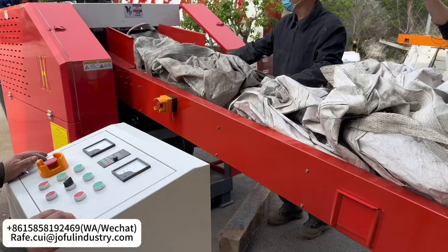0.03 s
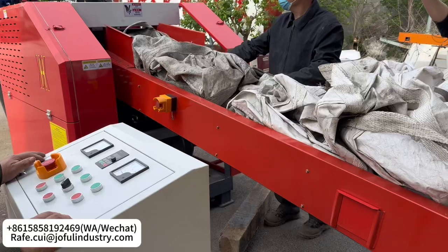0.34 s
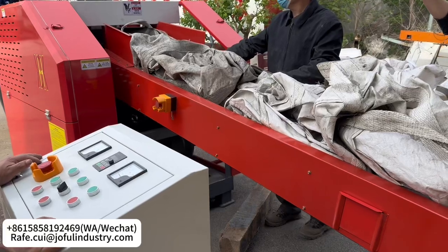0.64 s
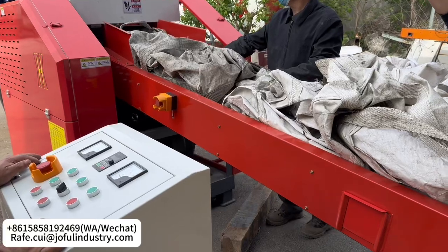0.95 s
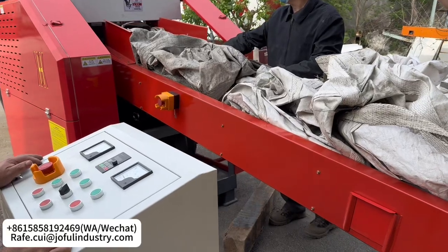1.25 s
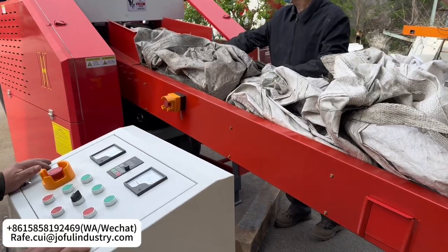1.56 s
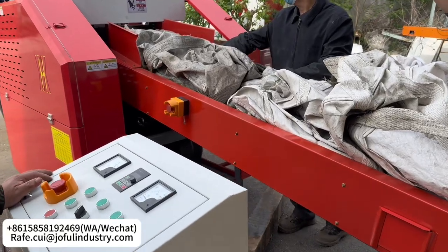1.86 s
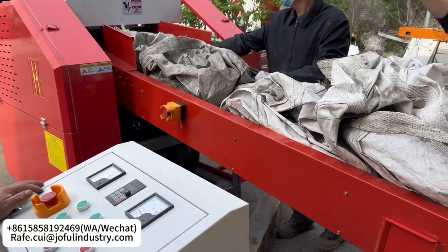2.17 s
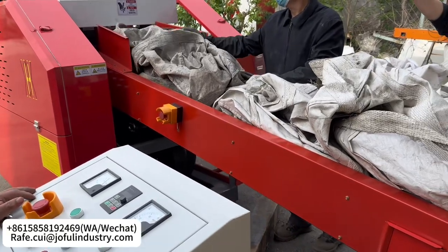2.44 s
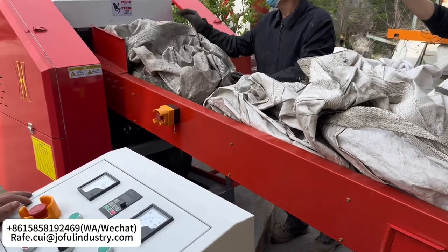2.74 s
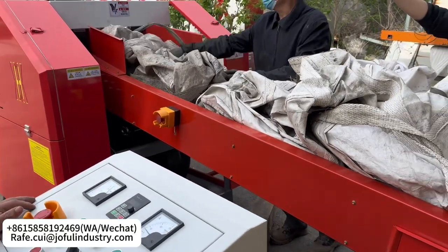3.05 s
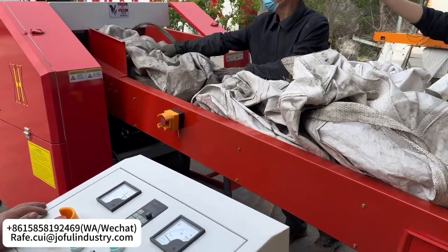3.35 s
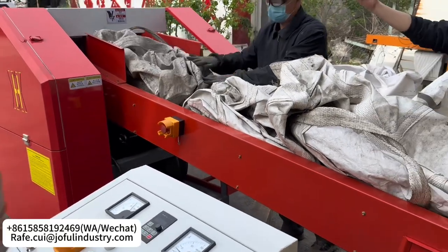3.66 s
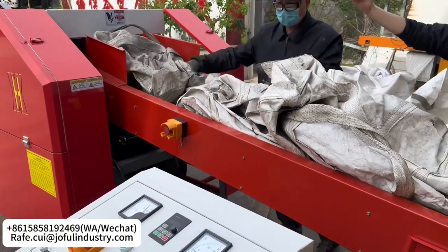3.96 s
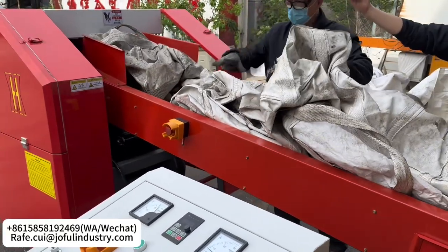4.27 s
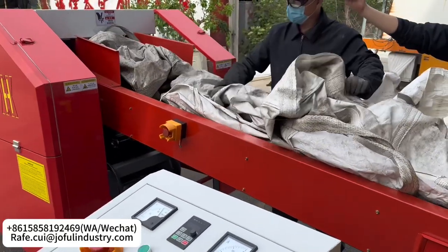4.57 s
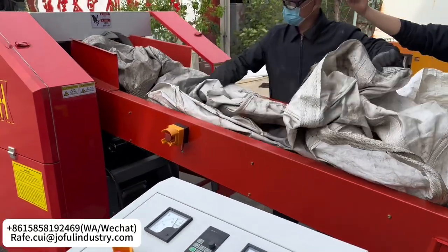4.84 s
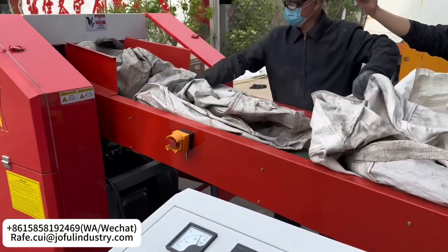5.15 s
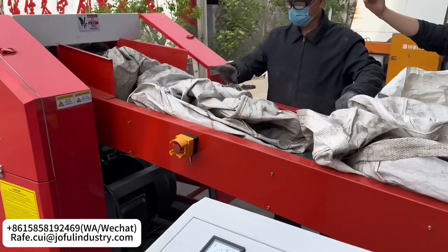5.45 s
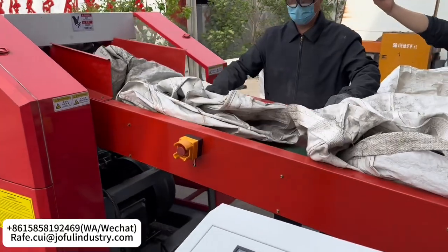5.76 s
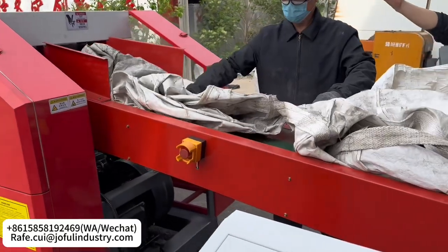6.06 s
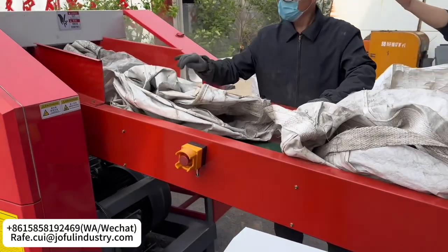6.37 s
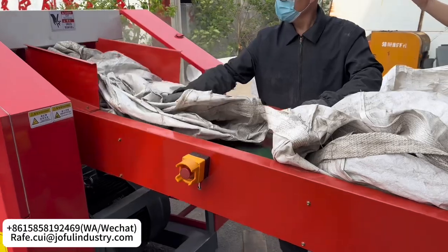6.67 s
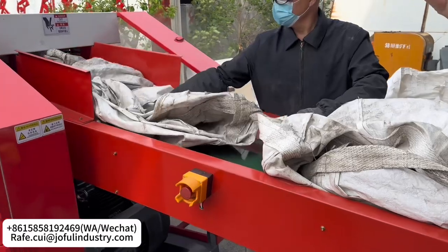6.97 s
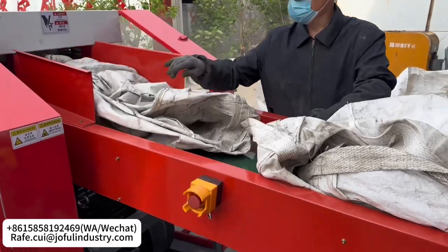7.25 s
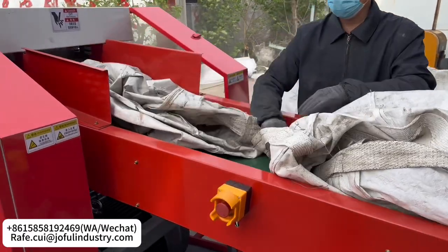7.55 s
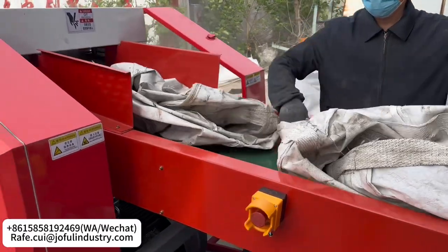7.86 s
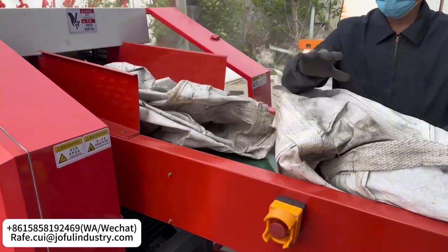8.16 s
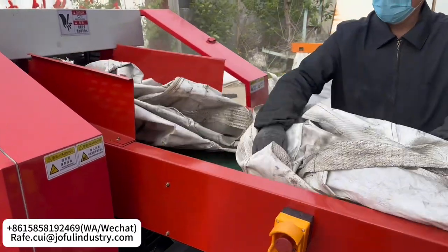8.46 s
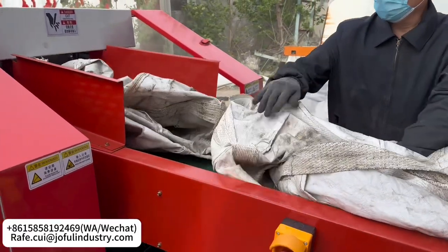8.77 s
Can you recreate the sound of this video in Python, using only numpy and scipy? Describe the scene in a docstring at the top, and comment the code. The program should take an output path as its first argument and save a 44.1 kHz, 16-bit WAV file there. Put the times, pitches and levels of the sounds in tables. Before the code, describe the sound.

Close to an outdoor shredding machine, a loud, fast-repeating mechanical drone carries the rasp and crackle of woven plastic sacks being torn. At first the steel rings brightly over it. Then the load builds: the sound grows lower and lumpier, fabric groans and squeals against metal, and the knives clink and knock. Thick wads thump through near the end, and the machine keeps grinding without a pause.

```python
"""Shredder chewing woven plastic bulk bags.

A single-shaft machine outdoors, heard beside its feed conveyor. Six knife rows pass in each turn, at
about 4.4 turns/s, so the housing drones in a repeating pattern. As more bag is drawn in, the drone
deepens and irregular churning grows; the knives rasp, the steel rings, the fabric crackles."""
import sys
import numpy as np
from scipy import signal
from scipy.fft import rfft, irfft, next_fast_len
from scipy.io import wavfile
from scipy.ndimage import uniform_filter1d, map_coordinates

SR = 44100
rng = np.random.default_rng(int(sys.argv[2]) if len(sys.argv) > 2 else 0)


def dump_mix(stems):
    """Bounce the given channels to the path in sys.argv[1] as a 16-bit WAV at rate SR."""
    frames = np.atleast_2d(stems).T  # one column per channel
    limited = np.clip(frames, -1, 1)  # hard clip at full scale
    pcm = np.round(limited * 32767).astype(np.int16)
    wavfile.write(sys.argv[1], SR, pcm)


N = 388521
TIME_S = np.arange(N) / SR
FFT_SIZE = next_fast_len(N, True)
BIN_HZ = np.maximum(np.arange(FFT_SIZE // 2 + 1) * SR / FFT_SIZE, 1)
TURN_SAMPLES = 10080

# Rotor speed, sagging under load: time_s, turns_per_s
ROTOR_SPEED = [(0, 4.373), (3.3, 4.373), (5.0, 4.365), (6.5, 4.351), (7.3, 4.339), (8.0, 4.34),
               (8.8, 4.348)]
# Knife rows, relative levels at light and heavy load: start_turns, length_turns, light_db, heavy_db
KNIFE_ROWS = [(0.051, 0.18, -1.5, -1.5), (0.222, 0.19, -1, -1.5), (0.387, 0.064, -14, -2.5),
              (0.558, 0.12, -7, -1.5), (0.725, 0.15, -1, -4.5), (0.892, .13, -5, -3.5)]


def from_db(db):
    """Decibels to gain."""
    return np.exp(np.asarray(db) * np.log(10) / 20)


def unit_rms(x):
    """Scale to rms 1."""
    return x / np.sqrt(np.mean(x ** 2) + 1e-20)


def in_time(rows):
    """Curve at every sample."""
    return np.interp(TIME_S, *np.transpose(rows))


def at_hz(rows, hz):
    """Each column of a spectrum at the given frequencies."""
    points_hz, *columns = np.transpose(rows)
    return [np.interp(np.log(hz), np.log(points_hz), column) for column in columns]


def colour(x, gain):
    """Filter by a gain per FFT bin."""
    return irfft(rfft(x, FFT_SIZE) * gain, FFT_SIZE)[..., :N]


def drift(cutoff_hz):
    """Smooth random curve, rms 1."""
    return unit_rms(colour(rng.standard_normal(N), 1 / (1 + (BIN_HZ / cutoff_hz) ** 4)))


def swell(start_s, length_s, edge_s):
    """Trapezoid window, 0 to 1."""
    return np.clip(.5 + np.minimum(TIME_S - start_s, start_s + length_s - TIME_S) / edge_s, 0, 1)


def resonate(x, hz, width_hz):
    """One resonance, peak gain 1."""
    radius = np.exp(-np.pi * width_hz / SR)
    feedback = [1, -2 * radius * np.cos(2 * np.pi * hz / SR), radius ** 2]
    return signal.lfilter(np.array([1, 0, -1]) * (1 - radius ** 2) / 2, feedback, x + 1e-18)


def ring_mode(x, load, hz, width_hz, light_db, heavy_db):
    """Resonance whose level follows the load."""
    return unit_rms(resonate(x, hz, width_hz)) * from_db(light_db + load * (heavy_db - light_db))


def each_turn(patterns, turns):
    """Loop a pair of one-turn patterns at the rotor's angle."""
    index = turns % 1 * TURN_SAMPLES
    return np.array([map_coordinates(p, [index], order=3, mode="grid-wrap") for p in patterns])


def once_a_turn(turns, peak_turns, swing_db):
    """Gain that peaks at one rotor angle."""
    return from_db(swing_db * np.cos(2 * np.pi * (turns - peak_turns)))


def cutting_force(turns, load, hold, rise_turns, light_gap_db, heavy_gap_db):
    """Each knife row bites quickly and lets go; a full gap rubs between the rows too."""
    grid_turns = np.arange(TURN_SAMPLES) / TURN_SAMPLES
    power = from_db([[light_gap_db], [heavy_gap_db]]) ** 2
    for start_turns, length_turns, *db in KNIFE_ROWS:
        age_turns = (grid_turns - start_turns) % 1
        attack = 1 - np.exp(-(age_turns / rise_turns) ** 2)
        release = np.exp(-(age_turns / (length_turns * hold)) ** 4)
        power = power + np.outer(from_db(db) ** 2, attack * release)
    light, heavy = [np.interp(turns % 1, grid_turns, p) for p in power]
    return unit_rms(np.sqrt((1 - load) * light + load * heavy))


def housing_drone(turns, load, scatter=.25, waver_db=.5):
    """The same blows recur every turn, so the housing sounds a dense comb of rotor orders."""
    # Blows swelling a housing mode: mode_order, place_turns, length_turns, light_db, heavy_db
    blows = [(24, .43, .19, 3, 3), (48, .7, .15, 6, 8), (62, .14, .07, 13, 4), (62, .34, .08, 15, 13),
             (62, .48, .07, 7, 13), (62, .95, .06, 5, 6), (84, .15, .12, 15, 6), (84, .31, .06, 2, 11),
             (84, .68, .06, 7, 11), (84, .92, .06, 11, 0)]
    # Strong multiples of the turn rate, relative levels: order, light_db, heavy_db
    strong_orders = [(12, -44.9, -45.2), (18, -33.3, -34.3), (22, -50.8, -38.7), (24, -35, -33.5),
                     (25, -41.2, -36.6), (26, -47.5, -38.2), (30, -38.5, -40.5), (36, -43.4, -34.5),
                     (42, -44.0, -31.5), (46, -37.5, -35.0), (48, -39.5, -29.5), (49, -39.3, -35.6),
                     (50, -46.2, -38.3), (54, -37.7, -46.0), (56, -41, -44), (60, -38.5, -38.9),
                     (61, -34.3, -39), (62, -27, -32.5), (63, -37.5, -40.5), (64, -40, -35),
                     (66, -35.9, -45.7), (67, -41, -45), (69, -43.5, -45), (73, -40.1, -41.1),
                     (74, -37.9, -40.9), (77, -42, -44), (84, -29.3, -47), (85, -39, -44), (86, -36, -36),
                     (88, -42, -45), (90, -43.5, -45), (92, -43.5, -45), (102, -37.5, -43.9),
                     (108, -39, -46), (114, -38.6, -41.3), (120, -41.3, -44.7)]
    # Orders between them: pitch_hz, light_db, heavy_db
    weak_orders = [(44, -66, -75), (63, -58, -60), (85, -65, -53), (118, -51, -43.5), (164, -48.5, -39.5),
                   (229, -41, -74), (273, -65, -49), (370, -49.5, -46.5), (470, -47.5, -55),
                   (646, -49, -44), (835, -50.5, -53), (1130, -58.5, -58)]
    orders = np.arange(1, 321)
    chance = rng.standard_normal((2, len(orders))) + 1j * rng.standard_normal((2, len(orders)))
    spectra = scatter * chance
    for mode_order, place_turns, length_turns, *db in blows:
        offset = orders - mode_order
        push = np.exp(-(np.pi * length_turns * offset) ** 2 - 2j * np.pi * offset * place_turns)
        mode_phasor = np.exp(1j * np.angle(chance[:, [mode_order - 1]]))
        spectra = spectra + from_db(db)[:, None, None] * push * mode_phasor
    # The blows set each order's phase, the housing its strength.
    levels_db = np.array(at_hz(weak_orders, orders * ROTOR_SPEED[0][1]))
    for order, *db in strong_orders:
        levels_db[:, round(order) - 1] = db
    combs = from_db(levels_db)[:, None] * spectra / abs(spectra)
    patterns = irfft(np.pad(combs, ((0, 0), (0, 0), (1, 0))), TURN_SAMPLES)
    light, heavy = [each_turn(pair, turns) for pair in patterns]
    drone = (1 - load ** 2) * light + load ** 2 * heavy
    return TURN_SAMPLES / np.sqrt(2) * drone * from_db(waver_db * drift(1.7))


def bag_churn(load, force, lumpy_db=1):
    """Bags are dragged and crushed differently each turn: a lumpy rumble growing with load."""
    # Rumble, relative noise density: freq_hz, light_db, heavy_db
    spectrum = [(20, -80, -78), (32, -71, -83), (49.4, -73, -74), (75, -43, -66.5), (112, -62, -48.5),
                (184, -54, -49.5), (261, -53, -46.5), (370, -52.5, -46.5), (600, -55.5, -53),
                (805, -63, -55), (1083, -58.5, -53.5), (1600, -66, -75), (2160, -95, -98)]
    lumps = force ** .78 * from_db(lumpy_db * drift(29))
    push = unit_rms(lumps * rng.standard_normal((2, N))) * np.sqrt(SR / 2)
    light, heavy = [colour(push, from_db(db)) for db in at_hz(spectrum, BIN_HZ)]
    return (1 - load) * light + load * heavy


def friction(turns, force, repeat_share, rough_db, clatter_db):
    """Rough rubbing under the knives; a share of it is clatter that repeats every turn."""
    clatter = rng.standard_normal((2, TURN_SAMPLES)) * from_db(clatter_db * drift(230)[:TURN_SAMPLES])
    repeating = np.sqrt(repeat_share) * each_turn(unit_rms(clatter), turns)
    fresh = np.sqrt(1 - repeat_share) * rng.standard_normal((2, N))
    return unit_rms((repeating + fresh) * force * from_db(rough_db * drift(155)))


def crackle(force, base_per_s, spread_db, decay_s):
    """Plastic tapes break in tiny bursts, more often while a knife cuts."""
    breaks = rng.random(N) < base_per_s * force / SR
    sizes = from_db(spread_db * np.minimum(rng.exponential(1, N), 4))
    power = signal.lfilter([1], [1, -np.exp(-1 / (decay_s * SR))], (breaks * sizes) ** 2 + 1e-18)
    return unit_rms(np.sqrt(power) * rng.standard_normal((2, N)))


def knife_rasp(turns, load, force):
    """Knives rasp through fabric, slightly softer in a full gap."""
    # Rasp colour: freq_hz, gain_db
    spectrum = [(700, -19), (1250, 3.5), (1600, 6.5), (1950, 2.5), (2400, 2), (3000, 1), (4200, -4),
                (5500, -5.5), (7000, -13), (9000, -22), (12000, -63), (16000, -32)]
    rasp = friction(turns, force, repeat_share=.3, rough_db=1, clatter_db=1.5)
    rasp += from_db(-6) * crackle(force, base_per_s=190, spread_db=4, decay_s=.024)
    return from_db(-31.5 - .9 * load) * unit_rms(colour(rasp, from_db(at_hz(spectrum, BIN_HZ)[0])))


def fibre_hiss(turns, force):
    """Tearing fibres give a fine, crackling hiss."""
    # Hiss colour: freq_hz, gain_db
    spectrum = [(4000, -17), (6500, 2), (8600, 5), (10500, -2), (12000, 1), (14000, -1.5), (16000, -3.5)]
    # Hiss envelope: time_s, level_db
    envelope = [(0, -44.5), (1.95, -43), (2.1, -39), (3.3, -39), (5.8, -39.5), (6.5, -39), (6.95, -34.5),
                (7.4, -38.5), (8, -37.5), (8.8, -40.5)]
    hiss = friction(turns, force ** .7, repeat_share=.15, rough_db=1.3, clatter_db=2.5)
    hiss += from_db(-2) * crackle(force, base_per_s=110, spread_db=3.3, decay_s=.004)
    return from_db(in_time(envelope)) * unit_rms(colour(hiss, from_db(at_hz(spectrum, BIN_HZ)[0])))


def steel_ring(rub, load, force):
    """Rubbing keeps the steel ringing, pulsed by the cutting force."""
    # Steel resonances: pitch_hz, width_hz, light_db, heavy_db
    modes = [(1203, 19, -31, -61), (2136, 11, -50, -58), (2628, 24, -49, -64), (3677, 13, -54, -56),
             (4030, 100, -49, -54), (642, 31, -45, -35), (854, 9, -48, -43), (1346, 17, -48, -59),
             (2360, 40, -46, -56.5)]
    return force * sum(ring_mode(rub, load, *mode) for mode in modes)


def stick_slip(rub, turns, bite):
    """Fabric sticks and slips on the steel; single resonances sing, pulsing with the knives."""
    # Tone kinds: kind, width_hz, steadiness, bite_exponent, peak_turns, swing_db, edge_s
    voices = [("groan", 11, .75, .6, .65, .5, .08), ("howl", 7, .9, .3, .25, 2.8, .12),
              ("chatter", 7, 1, 1, .75, 1, .12), ("ring", 14, .35, .6, .98, 2, .25)]
    # Fabric drags: kind, start_s, length_s, pitch_hz, level_db
    drags = [("groan", 3.87, .19, 642, -31), ("groan", 4.18, .1, 660, -30), ("groan", 4.41, .1, 640, -31),
             ("groan", 4.57, .36, 637, -31), ("groan", 5.4, .75, 630, -34.5), ("groan", 7.55, .3, 710, -33),
             ("groan", 8.15, .6, 578, -31), ("groan", 7.45, 1.3, 209, -28.5), ("howl", 0, 1.5, 847, -31),
             ("howl", 3.88, .12, 1085, -34), ("howl", 4.33, .42, 1085, -38),
             ("howl", 4.77, .17, 846, -28.5), ("howl", 5.15, 1.1, 1113, -36),
             ("howl", 5.43, .45, 845, -29.5), ("howl", 5.5, 1.95, 935, -37), ("howl", 6.45, .35, 843, -35),
             ("howl", 7.9, .95, 857, -33), ("chatter", 0, 1.4, 1686, -38.5),
             ("chatter", 3.3, .7, 1684, -36.5), ("chatter", 4.03, .37, 1575, -38.5),
             ("chatter", 5.25, 1.4, 1660, -40.5), ("chatter", 7.05, 1.15, 1665, -38),
             ("ring", 0, 1.1, 1684, -40), ("ring", 0, 2.2, 2137, -45.5), ("ring", 0, 3.4, 2632, -49),
             ("ring", 0, 2.2, 2929, -51.5), ("ring", 0, 1.3, 3505, -51), ("ring", 0, 1.9, 3677, -48),
             ("ring", 1.9, 2.4, 3677, -51), ("ring", 0, 2.3, 3978, -52.5), ("ring", 0, 4.2, 5700, -59),
             ("ring", .33, .14, 3690, -45), ("ring", 2.2, 1.2, 1190, -41), ("ring", 2.2, 4, 2155, -46.5),
             ("ring", 2.3, 1.7, 2980, -48), ("ring", 2.3, 1.8, 3451, -53)]
    out = np.zeros((2, N))
    for voice, width_hz, steadiness, bite_exponent, peak_turns, swing_db, edge_s in voices:
        pulse = unit_rms(bite ** bite_exponent * once_a_turn(turns, peak_turns, swing_db))
        for kind, start_s, length_s, pitch_hz, level_db in drags:
            if kind == voice:
                contact = swell(start_s, length_s, edge_s)
                touching = contact > 0
                tone = resonate(rub[:, touching], pitch_hz, width_hz)
                power = abs(uniform_filter1d(tone ** 2, size=256)) + 1e-12
                tone = unit_rms(tone / power ** (steadiness / 2))
                out[:, touching] += from_db(level_db) * tone * (contact * pulse)[touching]
    return out


def knife_chatter(turns, load, lag_turns=.028, spread_db=2):
    """Each row clips the counter-knife just after biting: one strike, varied per mode."""
    # Knife resonances: pitch_hz, width_hz, light_db, heavy_db
    modes = [(1603, 34, -50, -48), (1685, 18, -43, -46), (1773, 24, -49, -63), (2262, 44, -53, -51),
             (2990, 17, -57, -56)]
    hits = np.zeros(N)
    for start_turns, _, light_db, heavy_db in KNIFE_ROWS:
        at = np.flatnonzero(np.diff(np.floor(turns - start_turns - lag_turns)))
        hits[at] = from_db(light_db + load[at] * (heavy_db - light_db))
    at = np.flatnonzero(hits)
    out = np.zeros((2, N))
    for mode in modes:
        strengths = hits[at] * from_db(rng.normal(0, spread_db, len(at)))
        strikes = np.zeros((2, N))
        strikes[:, at] = strengths * rng.choice([-1, 1], (2, len(at)))
        out += ring_mode(strikes, load, *mode)
    return out


def frame_rumble(level_db, centre_hz=62, width_hz=91, rise_s=.026):
    """A low frame rumble swells as bunches of fabric pass; a sheared wad adds a boom."""
    # Thick wads jolting the rotor: start_s, pitch_hz, peak_db
    jolts = [(.575, 62, -27), (5.274, 107, -19), (6.284, 114, -27), (6.495, 108, -22),
             (6.728, 109.3, -15.5), (6.919, 188, -23), (7.186, 102, -14)]
    rumble = resonate(rng.standard_normal((2, N)), centre_hz, width_hz)
    out = unit_rms(resonate(rumble, centre_hz, width_hz)) * from_db(level_db)
    for start_s, pitch_hz, peak_db in jolts:
        age_s = np.maximum(TIME_S - start_s, 0)
        envelope = (age_s / rise_s * np.exp(1 - age_s / rise_s)) ** 2
        out[0] += from_db(peak_db) * envelope * np.sin(2 * np.pi * pitch_hz * age_s)
    return out


def sharp_cracks(crack_s=.003, knock_hz=760, knock_s=.0009):
    """Sharp cracks with dry knocks, many from one knife row striking hard under load."""
    # Cracks and their knocks, relative levels: start_s, crack_db, knock_db
    impacts = [(0.6374, -21, -22), (0.8664, -23, -22), (0.9338, -20, -19), (1.2714, -25, -21),
               (2.8804, -24, -20), (4.2514, -23, -18), (4.4794, -24, -17), (4.7074, -23, -16),
               (5.6266, -21, -16), (5.9674, -21, -17), (6.6544, -22, -20), (6.7734, -25, -14.5),
               (6.9314, -18, -19), (8.3934, -23, -15.5)]
    cracks, knocks = np.zeros((2, 2, N))
    age_s = TIME_S[:SR // 8]
    knock_envelope = age_s / knock_s * np.exp(1 - age_s / knock_s)
    for start_s, crack_db, knock_db in impacts:
        at = round(start_s * SR)
        knock = knock_envelope * np.sin(2 * np.pi * knock_hz * rng.uniform(.85, 1.2) * age_s)
        cracks[:, at:at + len(age_s)] += from_db(crack_db - 5) * np.exp(-age_s / crack_s)
        knocks[0, at:at + len(age_s)] += from_db(knock_db + 7) * knock
    return resonate(cracks * rng.standard_normal((2, N)), hz=3500, width_hz=5000) + knocks


def screen_grind(turns, force, centre_hz=996, width_hz=410):
    """Tough folds grind against the screen in gritty strokes, hardest at one rotor angle."""
    # Grinding spells: start_s, length_s, level_db
    spells = [(2.346, .5, -33), (2.9, 0.17, -29), (3.12, .3, -38), (3.848, 0.088, -37), (5.563, .35, -46),
              (6.15, 0.29, -40), (6.872, 0.44, -32.5), (8.3, 0.52, -33)]
    grit = crackle(force, base_per_s=260, spread_db=2.5, decay_s=.004)
    grit = resonate(resonate(grit, centre_hz, width_hz), centre_hz, width_hz)
    strokes = unit_rms(grit * force * once_a_turn(turns, peak_turns=.25, swing_db=5.5))
    return strokes * sum(from_db(db) * swell(*span_s, edge_s=.09) for *span_s, db in spells)


def knife_clinks(decay_s=.011, upper_ratio=1.3, upper_db=-7):
    """A knife catches hard and rings briefly, with a weaker upper mode."""
    # Hard catches: start_s, pitch_hz, relative_db
    catches = [(2.459, 1750, -24), (2.6845, 1760, -24), (2.758, 2250, -26), (3.3751, 1680, -24),
               (3.4128, 1680, -22), (3.459, 2620, -25), (3.495, 1680, -24), (5.397, 1650, -26),
               (5.6627, 1620, -25), (5.71, 1640, -23), (5.8962, 1700, -23), (5.9675, 1650, -25),
               (6.384, 1650, -23), (7.1149, 1650, -23), (7.153, 1660, -21), (7.306, 1660, -22),
               (7.466, 1670, -25), (7.5399, 1940, -23), (7.6167, 1680, -22), (8.0109, 1560, -21),
               (8.074, 1680, -22)]
    out = np.zeros((2, N))
    age_s = TIME_S[:SR // 8]
    for start_s, pitch_hz, relative_db in catches:
        phase = 2 * np.pi * (pitch_hz * age_s + rng.random((2, 1)))
        tone = np.sin(phase) + from_db(upper_db) * np.sin(upper_ratio * phase)
        at = round(start_s * SR)
        out[:, at:at + len(age_s)] += from_db(relative_db - 2.5) * np.exp(-age_s / decay_s) * tone
    return out


def stereo_image(fields):
    """Two unrelated sound fields arrive as sum and difference; the machine stands to the left."""
    # Left-right likeness, opposite phase near 8.5 kHz: freq_hz, correlation
    likeness = [(60, 1), (130, 0.91), (290, 0.91), (640, 0.5), (1300, -0.33), (2400, 0.44), (4400, 0.53),
                (6800, 0.28), (8000, -1), (9400, -1), (10200, 0.11), (12000, 0.79), (16000, 1)]
    # Balance: freq_hz, left_minus_right_db
    balance = [(25, 2), (60, -3.5), (130, 2.5), (270, -1), (550, 3), (1000, 4), (2000, 3.5), (4000, 2),
               (8000, 0.5)]
    correlation, = at_hz(likeness, BIN_HZ)
    lean_db, = at_hz(balance, BIN_HZ)
    mid, side = colour(fields, np.sqrt([(1 + correlation) / 2, (1 - correlation) / 2]))
    return colour(np.array([mid + side, mid - side]), from_db([lean_db / 2, -lean_db / 2]))


def scene():
    """Rotor angle, load and passing bunches of fabric drive the machine's layers."""
    # Cutting gap fill: time_s, load_fraction
    gap_fill = [(0, 0.22), (1.85, 0.34), (2.2, 0.35), (3.9, 0.6), (4.8, 0.76), (6.3, 0.87), (7.9, 1),
                (8.8, 0.85)]
    # Bunches passing, level offsets: start_s, length_s, roar_db, rasp_db, rumble_db
    bunches = [(-.2, 1.1, 0, -0.2, 9), (3.948, 0.98, 0, -0.8, 6), (6.613, 0.2, 1.5, 1.2, -1),
               (6.84, 0.24, 2.5, 2.5, -2), (7.062, 0.36, 0.1, 2, -2), (7.35, 1.6, 0, .6, 8),
               (7.65, 0.81, 1.2, 0.6, 1.5), (7.896, 0.17, 1, 1.2, 0)]
    turns = np.cumsum(in_time(ROTOR_SPEED)) / SR
    load = in_time(gap_fill)
    roar_db, rasp_db, rumble_db = sum(np.outer(db, swell(start_s, length_s, edge_s=.11))
                                      for start_s, length_s, *db in bunches)
    force = cutting_force(turns, load, hold=.99, rise_turns=.036, light_gap_db=-6, heavy_gap_db=-3.5)
    bite = cutting_force(turns, load, hold=.55, rise_turns=.03, light_gap_db=-14, heavy_gap_db=-12)

    roar = from_db(1) * housing_drone(turns, load) + bag_churn(load, force)
    turn_rms = np.sqrt(uniform_filter1d(np.mean(roar ** 2, axis=0), size=TURN_SAMPLES))
    roar *= from_db(-19 + roar_db) / turn_rms
    rasp = from_db(rasp_db) * knife_rasp(turns, load, force)
    hiss = fibre_hiss(turns, force)
    rub = friction(turns, force, repeat_share=.6, rough_db=1.5, clatter_db=3)
    metal = steel_ring(rub, load, force) + stick_slip(rub, turns, bite)
    metal += knife_chatter(turns, load) + screen_grind(turns, force) + knife_clinks()
    frame = frame_rumble(level_db=-45 + rumble_db)
    # One side of the rotor grips harder: a slight surge each turn, fading as the gap fills.
    surge = once_a_turn(turns, peak_turns=.15, swing_db=.25 * (1 - load))
    return stereo_image(surge * (roar + metal + hiss) + np.sqrt(surge) * rasp + frame + sharp_cracks())


def record(dry, start_s=.039, fade_s=.002, cutoff_hz=15850):
    """Abrupt start and a steep treble cut."""
    opening = np.clip((TIME_S - start_s) / fade_s, 0, 1)
    return colour(dry * opening, 1 / np.sqrt(1 + (BIN_HZ / cutoff_hz) ** 300))


dry = scene()
out = record(dry)
dump_mix(out)
```